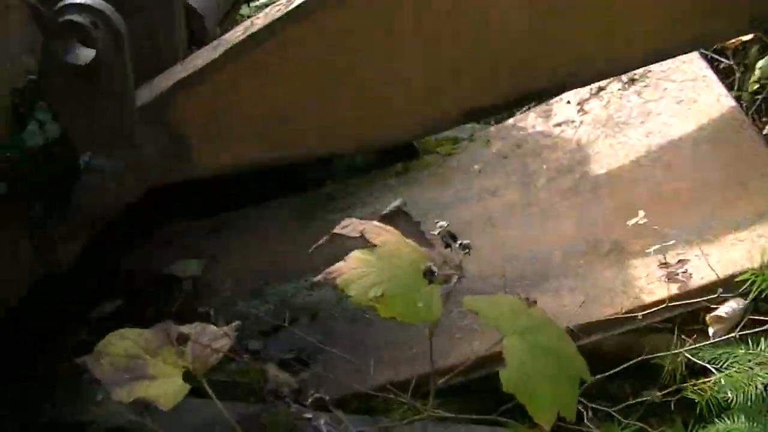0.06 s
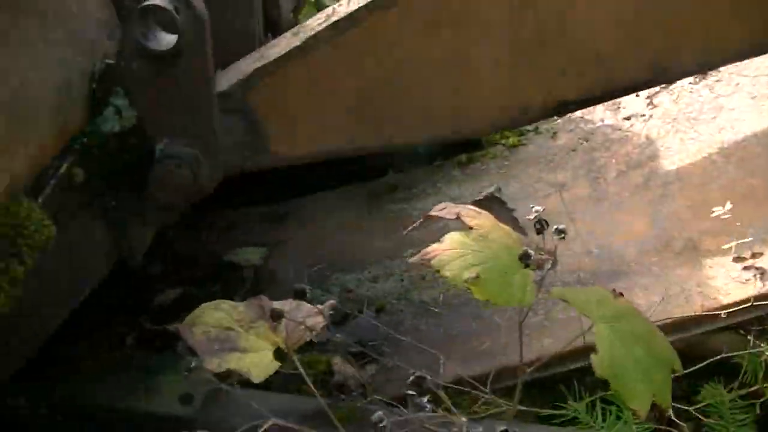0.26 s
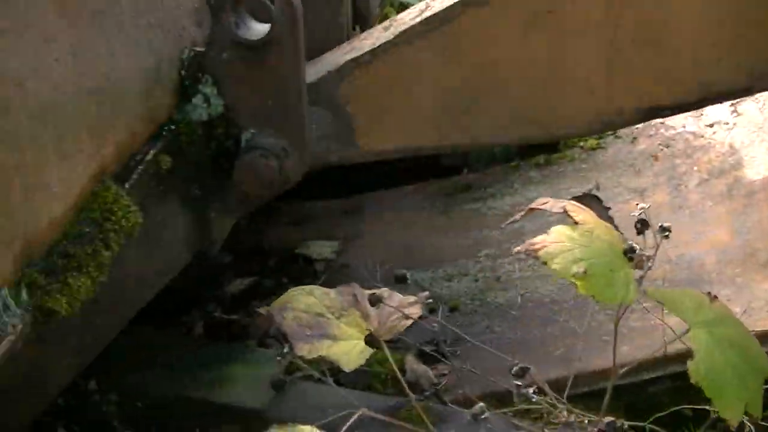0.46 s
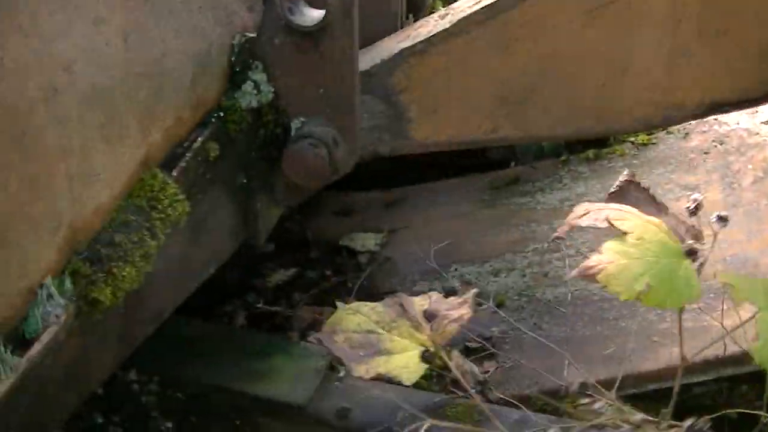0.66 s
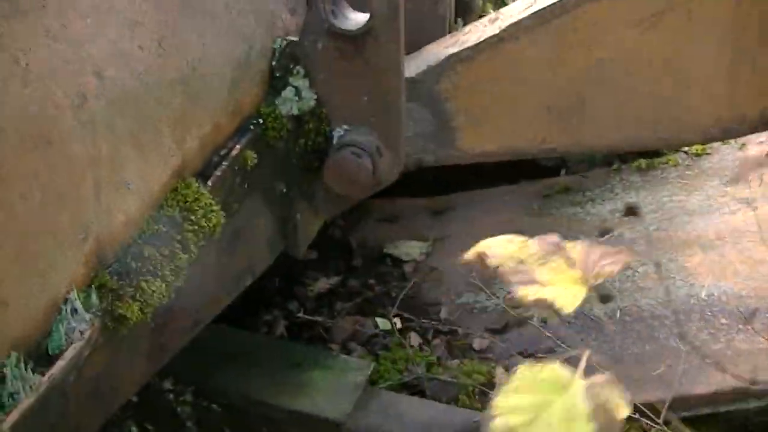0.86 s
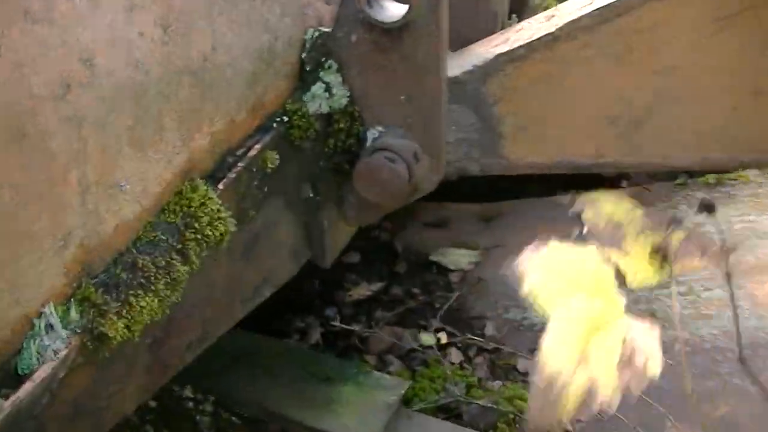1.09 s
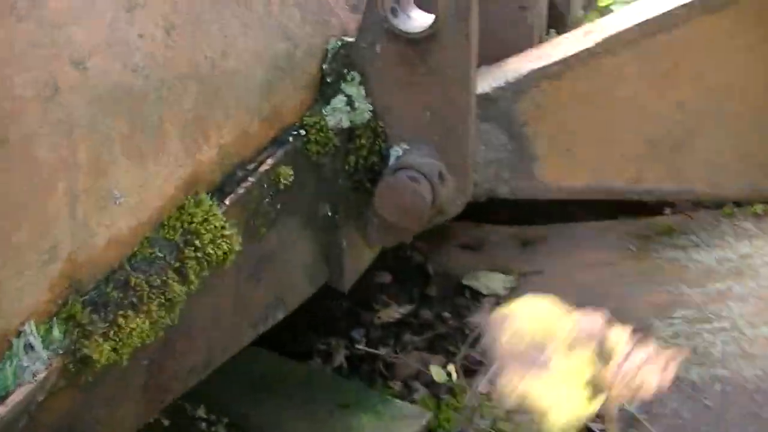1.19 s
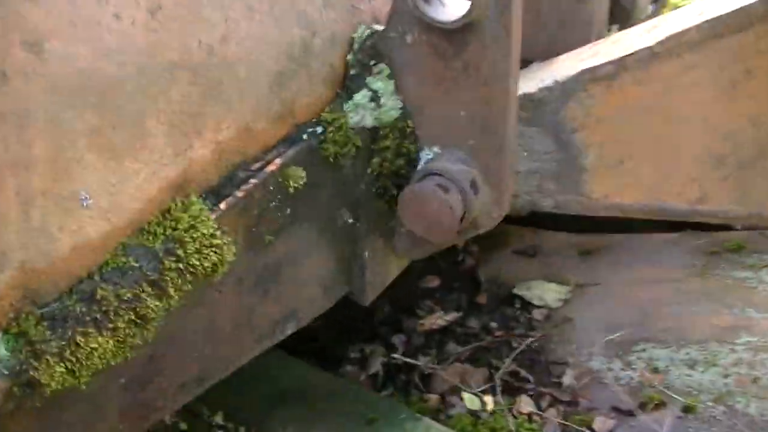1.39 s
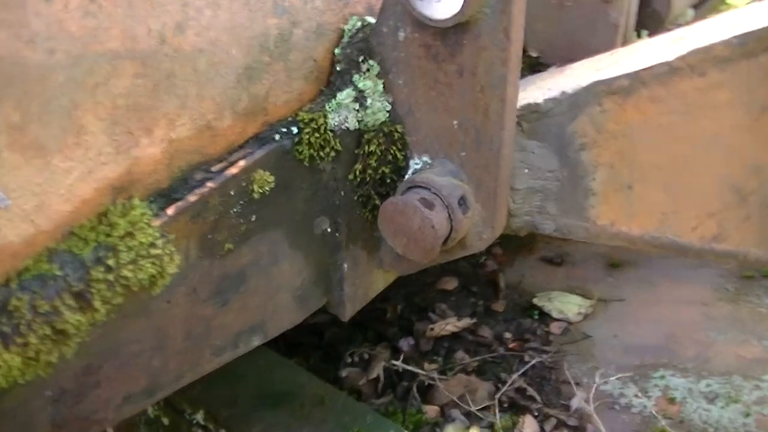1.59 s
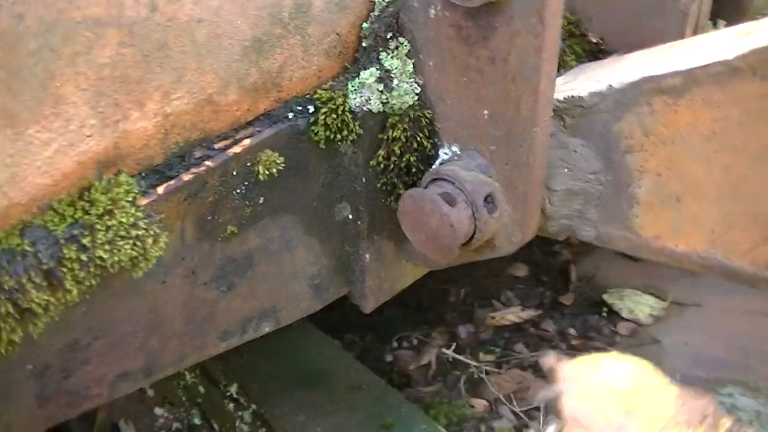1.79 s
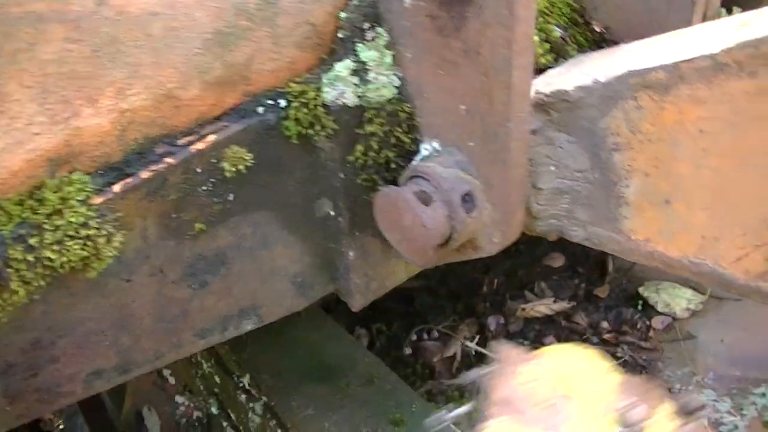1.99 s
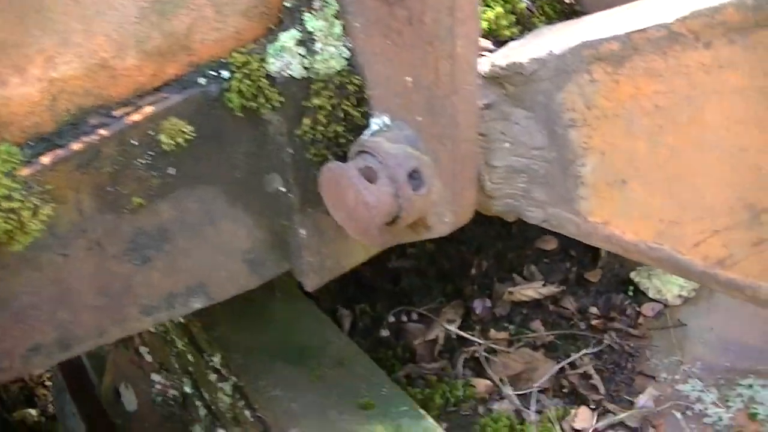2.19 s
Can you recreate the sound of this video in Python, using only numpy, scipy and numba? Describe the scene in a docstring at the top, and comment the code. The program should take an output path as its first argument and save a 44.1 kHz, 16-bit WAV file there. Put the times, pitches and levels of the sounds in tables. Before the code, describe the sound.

Leafy brush rustles close by as a hand pushes through it. Faint brushing at first grows from 0.3 seconds, fullest around 0.7 to 1.0, with dense papery ticks, crackling stems and clustered twig snaps. Sharp snaps come near 1.22 to 1.26 as it thins; by 1.4 only light rustling remains, with a crisp tick at 1.9 and faint ones after 2.1. Quiet woodland air, soft hiss, no deep bass.

```python
"""A rustle of leafy brush swells and dies away, close by in the woods, as a hand pushes through it.
Leaves brush as dense tiny ticks, each a damped sine; dry stems crackle as random bursts of noise.
Twigs snap as quick runs of ringing cracks with a hissing tail; the microphone cuts the bass.
Behind them lie filtered noises: quiet air that differs left and right, and a dark preamplifier hiss."""
import sys
import numpy as np
from scipy import signal
from scipy.fft import rfft, irfft
from scipy.io import wavfile
from scipy.ndimage import uniform_filter1d
from numba import njit

SR = 44100
rng = np.random.default_rng(int(sys.argv[2]) if len(sys.argv) > 2 else 0)


def boost_factor(decibels):
    """Convert a level in decibels to a linear amplitude factor."""
    exponent = np.asarray(decibels, float) / 20
    return 10 ** exponent


def store_wav(level_fs):
    """Save 16-bit WAV to argv[1]."""
    pcm = np.round(np.clip(np.atleast_2d(level_fs), -1, 1) * 32767)
    wavfile.write(sys.argv[1], SR, pcm.T.astype(np.int16))


N = 99225  # samples

# push of the hand through the leaves: start_s, level_db, brightness_db_per_octave, side_spread_db
PUSH = [(0, -47, -1.5, 10), (.1, -46, -0.5, 9), (.17, -42, -1, 6), (.19, -38, -3, 7), (.27, -34.5, -1, 4.5),
        (.36, -30, 0, 1), (.42, -30.5, -2, 3), (.52, -29, 1, 0), (.58, -28, -0.5, 3), (.63, -25.5, -1, 3),
        (.67, -29.5, 0.5, 3), (.69, -22, 1, 0), (.74, -23, 0, 4), (.79, -25.5, 0.5, 3.5),
        (.85, -27.5, -0.5, 4), (.93, -25, -1, 5), (1.0, -29, 0, 3), (1.06, -33, 0, 4),
        (1.12, -28, -0.5, 4.5), (1.2, -32.5, 1, 4), (1.3, -33, -0.5, 3), (1.4, -38, 0, 3.5),
        (1.53, -38, 0, 5.5), (1.63, -40.5, 0, 7), (1.69, -40, 0, 8.5), (1.77, -39.5, -1.5, 5),
        (1.88, -42.5, -1.5, 8), (1.92, -36.5, -1, 13), (1.955, -41, -0.5, 4), (2.0, -41, -0.5, 6),
        (2.12, -40.5, -1, 8), (2.25, -45.5, -2, 6)]
# colour of leaves as the microphone hears them: frequency_hz, gain_db
LEAF_COLOUR = [(60, -68), (150, -46.5), (260, -25), (420, -10.5), (800, -4.5), (1400, -1), (2500, -2.5),
               (4000, -5.5), (7000, -9), (11000, -21.5), (16000, -37)]


def table(rows, x, col=1, log=False):
    """Linear interpolation between the rows of a table, on a logarithmic axis if asked."""
    rows = np.array(rows, float)
    if log:
        return np.interp(np.log(x + 1), np.log(rows[:, 0] + 1), rows[:, col])
    return np.interp(x, rows[:, 0], rows[:, col])


def unit(x):
    """Normalisation to an rms of 1."""
    return x / np.sqrt(np.mean(x ** 2))


def colour(x, *shapes):
    """Minimum-phase filtering: folding the cepstrum makes a causal filter from the summed dB gains."""
    gain_db = sum(table(shape, np.linspace(0, SR / 2, 1025), log=True) for shape in shapes)
    cepstrum = irfft(np.log(boost_factor(gain_db)))
    cepstrum[1:1024] *= 2
    cepstrum[1025:] = 0
    impulse_response = irfft(np.exp(rfft(cepstrum)))
    return signal.fftconvolve(x, impulse_response)[:N]


def walk(rate_hz):
    """Slow random modulation: levels drawn at the given rate, smoothed, with an rms of 1."""
    hold = int(SR / rate_hz)
    levels = np.repeat(rng.standard_normal(N // hold + 1), hold)
    smooth = uniform_filter1d(uniform_filter1d(levels, hold), hold)
    return unit(smooth[:N])


def brush():
    """Amplitude modulation: the push of the hand sets the level of ticks and crackles, in mid and side."""
    flutter_db, crackle_db = 0.64, -7  # rms of the level flutter; crackles against ticks
    # width of the rustle, added to the side alone: frequency_hz, gain_db
    width = [(60, -1), (200, -38), (500, -25), (1300, -41), (2500, -27), (4500, -25), (6500, -28),
             (10000, -21.5), (16000, -23)]
    t = np.arange(N) / SR
    push = boost_factor(table(PUSH, t) + flutter_db * walk(39.48))
    mid, side = (ticks() + boost_factor(crackle_db) * crackles() for _ in range(2))
    mid = colour(mid, LEAF_COLOUR)
    side = colour(side, LEAF_COLOUR, width) * boost_factor(table(PUSH, t, col=3))
    return push * np.array([mid, side]) / np.std(mid)


def ticks():
    """Granular superposition: ticks of every pitch; registers flutter apart, crushed leaves shift levels."""
    count, ring_cycles = 60000, 1.78
    spread_db, patch_db = 2, 0.37  # scale of the exponential level scatter; rms flutter of a register
    crush_octaves = 0.63  # pitch distance at which a level change in dB falls to 1/e
    # leaf ticks swelling, or once thinning, round one pitch:
    # centre_s, half_length_ms, pitch_hz, level_change_db
    crushes = [(0.082, 8.5, 1250, 11), (.25, 18, 1150, 8), (.33, 12, 1860, 3.5), (.485, 25, 3100, 5),
               (0.523, 29, 3020, 8), (0.608, 14, 1130, 9), (.63, 6, 1600, 0), (.71, 7.1, 1260, 4.5),
               (.733, 6.1, 2800, 6.5), (0.794, 10, 1460, 6), (0.931, 4.3, 1690, 13),
               (1.085, 9.5, 2080, 8.5), (1.105, 3.5, 3480, 8), (1.121, 3.2, 2000, 8), (1.35, 6.4, 2500, -3),
               (1.53, 13, 3140, 1), (1.692, 14, 3000, 7.5), (1.72, 9.1, 1600, 3), (1.821, 3.8, 1280, 8),
               (2.155, 6.9, 1500, 5)]
    u = rng.random((count, 4)).T
    at = (u[0] * N).astype(np.int64)
    octave = 7 * u[1] ** .6  # small high ticks are the most frequent
    hz = 140 * 2 ** octave
    patch = np.array([walk(13.04) for _ in range(7)])[octave.astype(int), at]
    tilt_db = table(PUSH, at / SR, col=2) * np.log2(hz / 2000)
    db = -spread_db * np.log(u[2] + 1e-4) + patch_db * patch + tilt_db
    for s, ms, leaf_hz, change_db in crushes:
        time_off = (at / SR - s) * 1000 / ms
        pitch_off = np.log2(hz / leaf_hz) / crush_octaves
        db = db + change_db * np.exp(-time_off ** 2 - pitch_off ** 2)
    polarity = np.sign(u[3] - .5)
    size = polarity * hz / np.cbrt(octave + 1) * boost_factor(db)
    return unit(grains(at, hz, ring_cycles + 0 * hz, size))


@njit
def grains(start, hz, cycles, size):
    """Damped oscillation: each grain is a sine that falls to 1/e in the given number of cycles."""
    out = np.zeros(N + 8192)
    for k in range(len(start)):
        step = np.exp((2j * np.pi - 1 / cycles[k]) * hz[k] / SR)  # turn and decay in one sample
        z = size[k] + 0j
        for i in range(min(int(6 * cycles[k] * SR / hz[k]), 8000)):
            z *= step
            out[start[k] + i] += z.imag
    return out[:N]


def crackles():
    """Shot noise: dry stems and leaf edges give short broad bursts of very uneven size at random times."""
    count, spread_db, decay_s = 900, 3.5, 0.0037
    u = rng.random((count, 2)).T
    kick = np.zeros(N)  # power of each burst
    kick[(u[0] * N).astype(int)] = boost_factor(-2 * spread_db * np.log(u[1] + 0.03))
    power = signal.lfilter([1], [1, -np.exp(-2 / (decay_s * SR))], kick)
    return unit(np.sqrt(power) * rng.standard_normal(N))


def snaps():
    """Impulse excitation: parting fibres crack in a run, each ringing near the twig's pitch; leaves hiss on."""
    # twig snaps (bright crack set against the ring, before the low cut):
    # start_s, ring_peak_db, ring_hz, crackle_length_ms, bright_crack_db
    twigs = [(.0044, -30.5, 1610, 7.4, -37), (.0703, -32, 2330, 2.8, -11), (0.251, -24, 1160, 2.6, -21),
             (0.3759, -20, 1920, 1.4, -13), (.379, -17.5, 1390, 1.1, -6), (.4652, -17.5, 1430, .6, -28),
             (.509, -15, 2300, 1, -24), (.537, -12.5, 3240, 0.82, -13), (.6853, -16.5, 1740, 5.7, -2.5),
             (0.7282, -11, 3280, 0.41, -14), (0.8614, -13.5, 2030, 1, -23), (0.878, -13.5, 2470, 0.21, -2),
             (0.8792, -12.5, 1750, 5.5, -6), (.8901, -21.5, 1880, 3.6, 4), (0.9018, -11, 6300, 0.1, -5.5),
             (0.9025, -18, 4300, 4.5, 2), (1.0134, -18, 4000, 0.33, -17), (1.014, -18, 2340, 2.5, -15),
             (1.2225, -9, 5040, 0.51, -25), (1.224, -16, 3200, 5.5, -9), (1.2328, -15, 5400, .3, -8),
             (1.244, -26, 1600, 1, -6), (1.2555, -23, 1900, 0.1, -15), (1.256, -5.5, 1830, 0.058, -5),
             (1.3022, -31, 6000, .5, 3), (1.452, -22.5, 2700, 9, -9), (1.6505, -23.5, 2920, 9.9, -2),
             (1.6527, -23, 1820, 5.9, -14), (1.6531, -27, 4030, 0.41, -6), (1.7431, -29, 2580, 2, -26),
             (1.8953, -23, 2440, 0.49, -5), (1.8994, -11, 1350, 0.12, -8), (1.9004, -18.5, 2130, 1.9, -6),
             (2.082, -31, 3500, 1.9, -1), (2.0854, -25, 1900, 3, -4.5), (2.121, -28, 3500, 1.3, -19),
             (2.2083, -24.5, 1550, 1.1, -16), (2.2087, -27, 2680, 0.74, -14)]
    # colour of the bright crack: frequency_hz, gain_db
    crack_colour = [(100, -84), (500, -57), (2000, 1.5), (6000, 2.5), (9000, -2), (12000, -10),
                    (16000, -27)]
    cracks_per_ms, later_cracks_db = 3, -7  # later cracks against the first
    rise_ms, ring_ms, splinter_ms = 0.1, 0.24, 0.36  # ring rise, least decay, extra decay if splintering
    scatter_octaves = 0.4  # largest pitch offset of the later cracks
    tail_db, tail_s = -20.5, 0.0089  # tail gain, and its decay to 1/e
    side_gain_db = -17.5
    out, t = np.zeros((2, N + 4096)), np.arange(4096) / SR
    age = 1000 * t[:256]  # ms since a crack
    cut = signal.butter(4, 650, "high", fs=SR, output="sos")
    dull = signal.butter(3, 6500, fs=SR, output="sos")
    for s, db, hz, ms, bright_db in twigs:
        u, g = rng.random(len(t)), rng.standard_normal((4, len(t)))
        cracks = (u < cracks_per_ms * 1000 / SR) * np.sign(g[0]) * boost_factor(later_cracks_db)
        cracks[0] = 1
        cracks *= np.exp(-(t * 1000 / max(ms, .1)) ** 3)
        # a clean short break rings less long than a splintering one
        decay_ms = ring_ms + splinter_ms * min(ms, 1)
        envelope = (1 - np.exp(-age / rise_ms)) * np.exp(-age / decay_ms)
        ring = np.zeros(len(t))
        for i in np.flatnonzero(np.abs(cracks[:2048]) > 1e-3):
            pitch = hz * 2 ** (scatter_octaves * (i > 0) * np.tanh(g[3, i]))
            ring[i:i + len(age)] += cracks[i] * envelope * np.sin(2 * np.pi * pitch * t[:len(age)])
        ring = signal.sosfilt(np.vstack([cut, dull]), ring)
        ring = ring / np.abs(ring).max()
        # noise envelope: the energies of the cracks add, each dying away in 0.44 ms
        fizz = np.sqrt(np.convolve(cracks ** 2, np.exp(-t[:128] / 0.00044))[:len(t)])
        for side, side_db in enumerate((0, side_gain_db)):
            crack = colour(fizz * np.sign(g[1 + side]), crack_colour)[:len(t)]
            leaf_hiss = unit(colour(g[2 + side], LEAF_COLOUR)[:len(t)])
            bright_hiss = unit(colour(g[1 + side], crack_colour)[:len(t)])
            tail = np.exp(-t / tail_s) * (leaf_hiss + boost_factor(bright_db + 2.5) * bright_hiss)
            wide = boost_factor(bright_db) * crack / np.abs(crack).max() + boost_factor(tail_db) * tail
            snap = signal.sosfilt(cut, wide) + (1 - side) * ring  # the ring is in the mid alone
            out[side, int(s * SR):][:len(t)] += boost_factor(db + side_db) * snap
    return out[:, :N]


def woods():
    """Uncorrelated noise, unlike left and right: band-passed air of the woods and dark preamplifier hiss."""
    air_db, hiss_db = -72, -83  # rms
    band = signal.butter(2, [350, 1100], "band", fs=SR, output="sos")
    air = signal.sosfilt(band, rng.standard_normal((2, N)))
    hiss = signal.lfilter([1], [1, -.97], rng.standard_normal((2, N)))  # one-pole low-pass
    return boost_factor(air_db) * unit(air) + boost_factor(hiss_db) * unit(hiss)


def scene():
    """Sum and difference: mid and side of the near sounds become left and right, over the woods."""
    mid, side = brush() + snaps()
    return np.array([mid + side, mid - side]) + woods()


def roll_off(x):
    """The treble ends steeply here."""
    return signal.sosfilt(signal.butter(12, 16810, fs=SR, output="sos"), x)


def record(dry):
    """Signal chain: the finished mix passes through one last stage."""
    return roll_off(dry)


dry = scene()
out = record(dry)
store_wav(out)
```